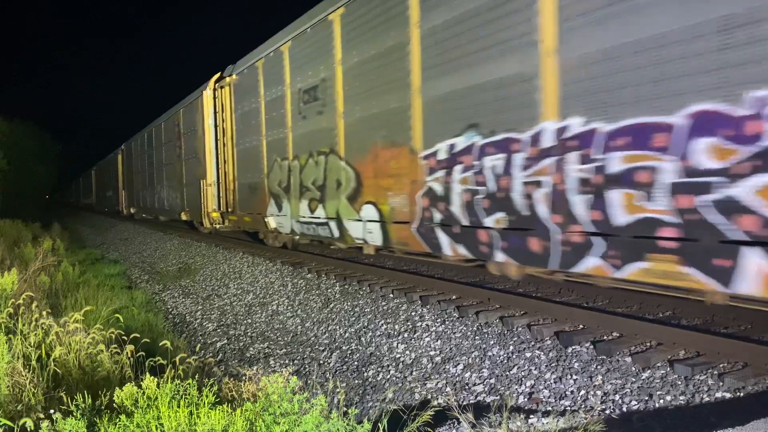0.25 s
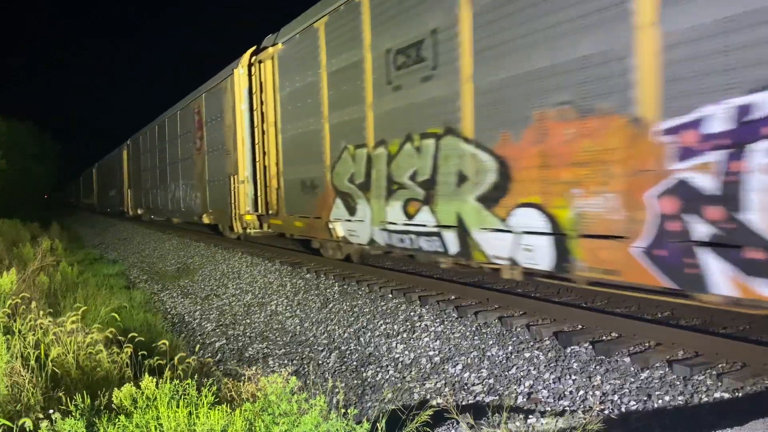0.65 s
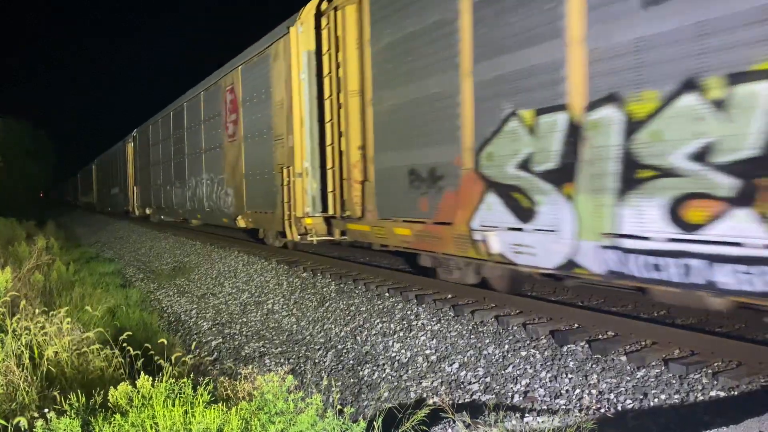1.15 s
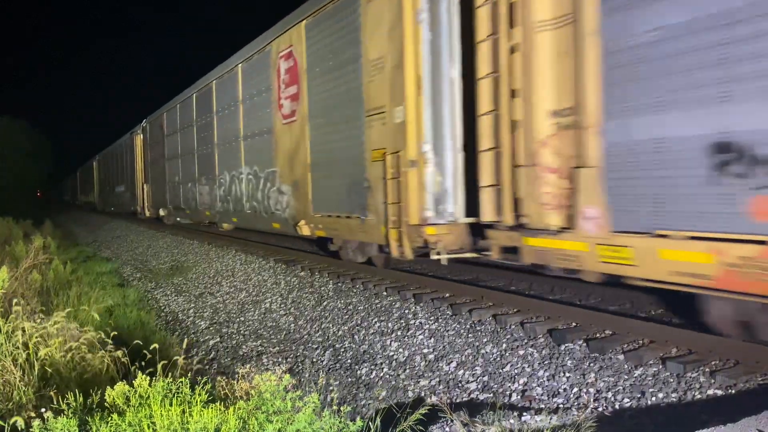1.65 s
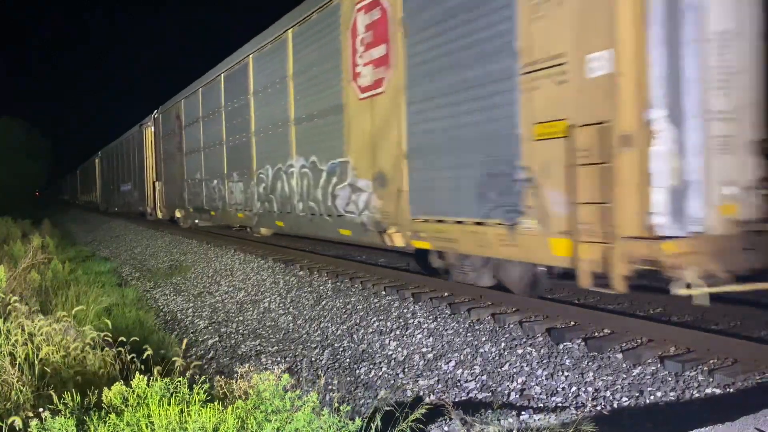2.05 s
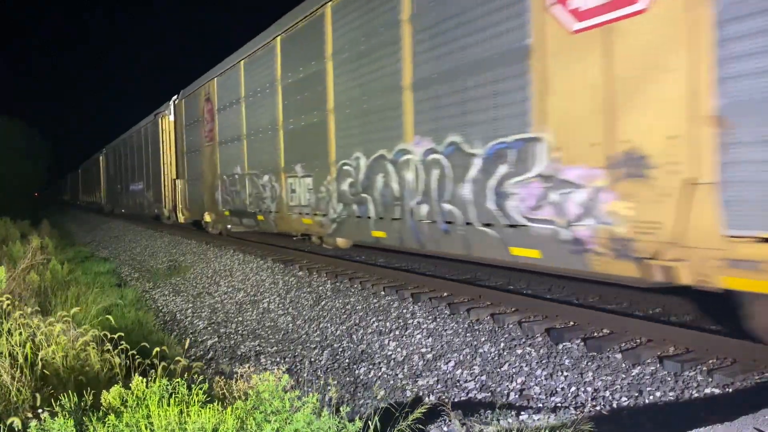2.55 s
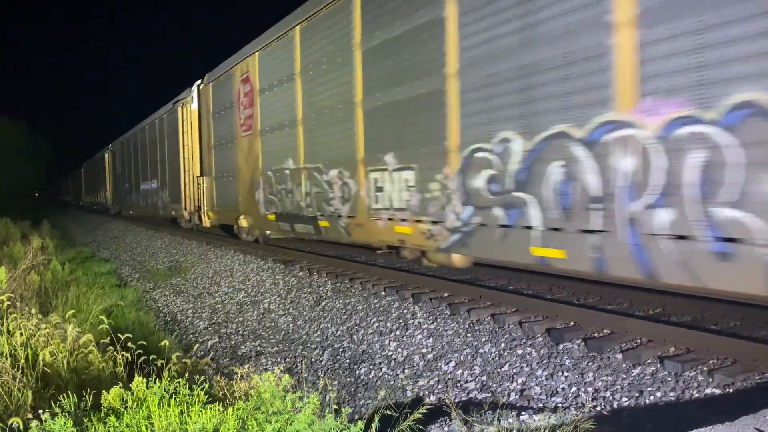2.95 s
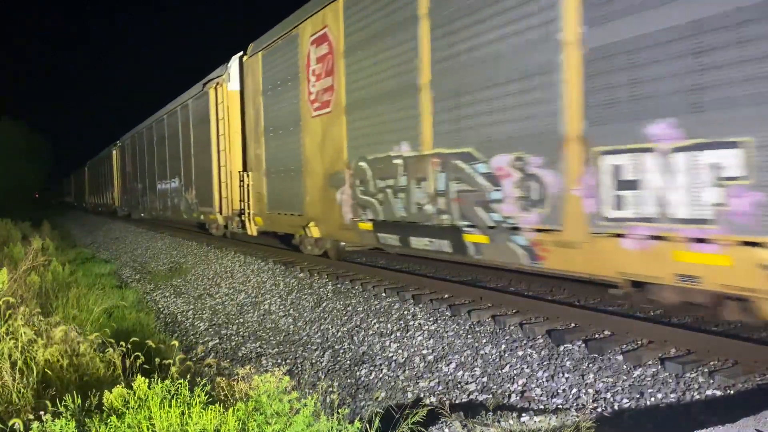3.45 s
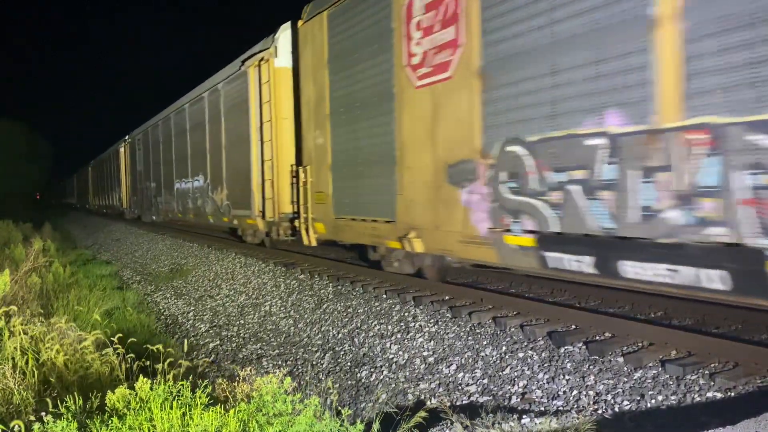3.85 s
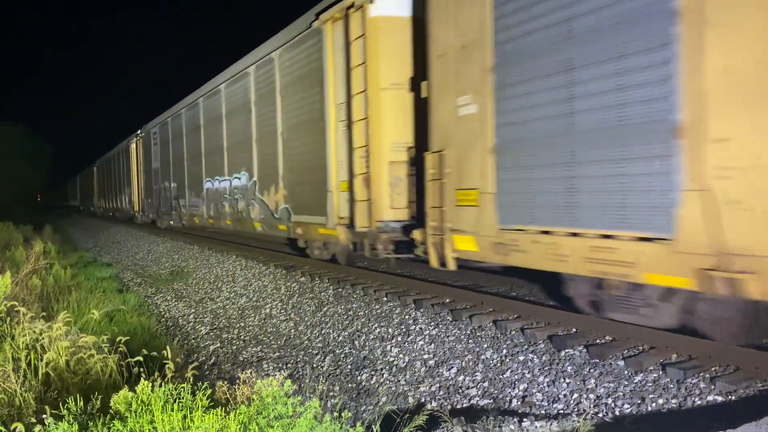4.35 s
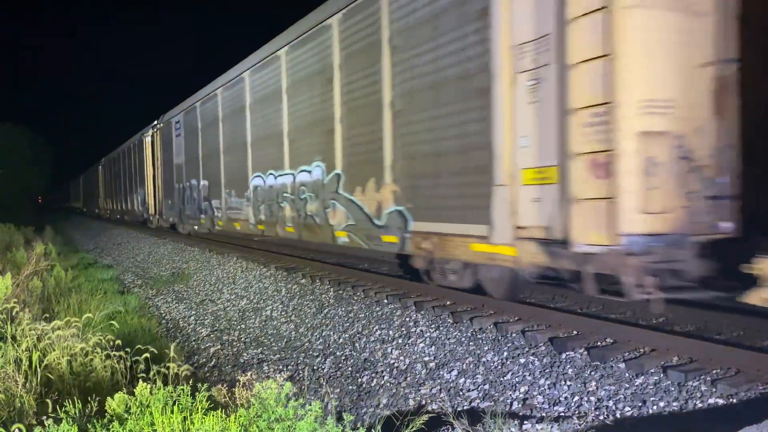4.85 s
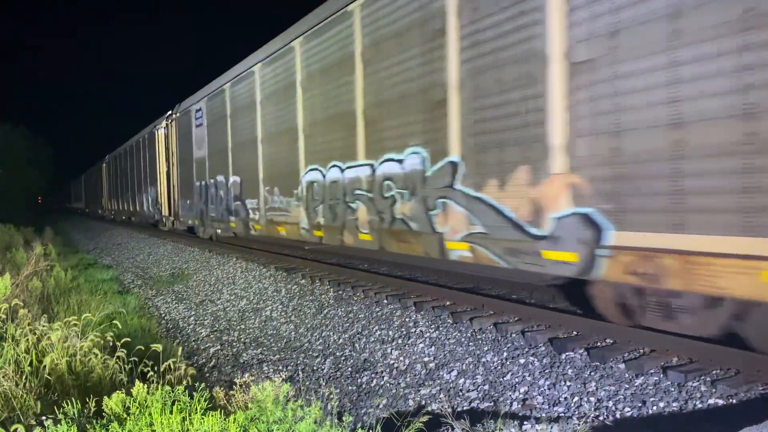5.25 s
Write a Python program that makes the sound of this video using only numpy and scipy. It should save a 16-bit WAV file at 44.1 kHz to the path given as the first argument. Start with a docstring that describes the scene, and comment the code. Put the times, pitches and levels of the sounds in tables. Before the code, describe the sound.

Close beside the track outdoors, a long freight train rolls by without a break. Hollow car bodies rumble low and their panels drum, while wheels roar and hiss on steel. Uneven deep thumps come several times a second. Brief faint squeaks appear early; from the middle on, gritty wheel scrapes pulse about five times a second, swelling to a loud clattering rush near the end. Stereo, bass-heavy handheld pickup.

```python
"""Deep rumble, wheel roar and quick heavy thumps: a freight train of tall car carriers rolls past close by.
The car bodies are evened-out low noise; their panels drum harder at each thump and bang, and some hum a note.
The wheels are steel-coloured noise, part spread along the train, part sliding from the middle to the right.
Out-of-round wheels thump as sagging deep tones, about once a turn each, stronger later on.
Brief squeaks are ragged narrow tones; scrapes are swells of growl, grinding, hiss and ringing clatter."""
import sys
import numpy as np
from scipy import signal
from scipy.fft import rfft, irfft
from scipy.io import wavfile
from scipy.ndimage import uniform_filter1d, map_coordinates

SR = 44100
rng = np.random.default_rng(int(sys.argv[2]) if len(sys.argv) > 2 else 0)


def master_out(mix):
    """Clip the mix to full scale and print it as 16-bit PCM to the path in sys.argv[1]."""
    frames = np.transpose(np.atleast_2d(mix))
    ceiling = np.clip(frames, -1, 1)
    pcm = np.round(ceiling * 32767).astype(np.int16)
    wavfile.write(sys.argv[1], SR, pcm)


N = 242991
TIME = np.arange(N) / SR
FREQS = np.maximum(np.fft.rfftfreq(N, 1 / SR), 1)

# heaves of the cars over out-of-round wheels:
# (time [s], half length [s], boom pitch [Hz], level [dB])
HEAVES = [(0.06, 0.061, 74.3, -24), (0.153, 0.033, 68, -19), (0.405, 0.024, 71, -21),
          (0.605, 0.028, 80, -16), (0.797, 0.013, 85, -12.5), (0.935, 0.047, 78.4, -21.5),
          (1.106, 0.013, 84, -14.5), (1.456, 0.061, 72.2, -17.5), (1.685, 0.03, 68.7, -12),
          (1.899, 0.058, 80, -14), (2.103, .026, 70, -15.5), (2.361, 0.037, 67.5, -15),
          (2.535, 0.042, 75, -12.5), (2.795, .022, 68, -11.5), (2.951, 0.02, 68, -10),
          (3.172, 0.023, 81.5, -12.5), (3.298, 0.023, 78, -15.5), (3.455, 0.028, 83, -11.5),
          (3.632, 0.06, 74.6, -13), (3.88, 0.026, 67, -12), (4.039, 0.032, 76, -15.5),
          (4.221, 0.018, 71, -16), (4.403, 0.018, 62, -13), (4.487, 0.029, 77, -12),
          (4.552, 0.015, 66, -11.5), (4.697, 0.016, 63, -11), (4.761, 0.048, 59, -12.5),
          (4.923, 0.027, 67, -10.5), (4.99, 0.031, 57.7, -9), (5.147, 0.017, 68, -8.5),
          (5.213, 0.027, 59, -10), (5.379, 0.013, 67.4, -9), (5.452, 0.027, 52, -19)]


def from_db(db):
    """Decibels to gain."""
    return 10 ** (np.asarray(db) / 20)


def rms_one(x):
    """Scale to unit power."""
    return x / np.sqrt(np.mean(x ** 2) + 1e-20)


def over_hz(points):
    """Join (frequency [Hz], value) points on a log-frequency axis."""
    hz, value = np.transpose(points)
    return np.interp(np.log(FREQS), np.log(hz), value)


def in_time(rows):
    """Join the columns of a curve by straight lines in time."""
    times, *columns = np.transpose(rows)
    return [np.interp(TIME, times, column) for column in columns]


def white(count):
    """Spectra of unrelated white noises."""
    shape = (count, len(FREQS))
    return rng.standard_normal(shape) + 1j * rng.standard_normal(shape)


def drift(rate_hz):
    """Smooth random wandering of spread 1, with two random knots per cycle of the rate."""
    knots = rng.standard_normal(N // 20)
    coarse = TIME[::8]
    curve = map_coordinates(knots, [coarse * rate_hz * 2], order=2, mode="wrap")
    return rms_one(np.interp(TIME, coarse, curve))


def swell(at, half_length, time=TIME, tail=1.016, squareness=2):
    """A bell of height 1 that falls a little more slowly than it rises; squareness above 2 flattens its top."""
    width = half_length * np.where(time < at, 1 / tail, tail)
    distance = np.abs((time - at) / width)
    return np.exp(-0.5 * np.minimum(distance ** squareness, 60))


def swells(times, half_lengths, levels_db, squareness=2):
    """An envelope of swells; where they overlap they add in power."""
    coarse = TIME[::40]
    power = np.zeros(len(coarse))
    for at, half, db in np.broadcast(times, half_lengths, levels_db):
        power += (from_db(db) * swell(at, half, coarse, squareness=squareness)) ** 2
    return np.interp(TIME, coarse, np.sqrt(power))


def steel(colour):
    """Gain over frequency: a broad colour reshaped by the resonances of wheels and side panels."""
    # steel resonances: (pitch [Hz], width [Hz], lift [dB])
    resonances = [(275, 3.1, 2), (917, 33, -0.5), (1566, 56, 3), (1730, 43, 1.5), (2530, 91, 3),
                  (3010, 25, 3), (7230, 170, -1.5)]
    lift_db = sum(db / (1 + (2 * (FREQS - hz) / width) ** 2) for hz, width, db in resonances)
    return from_db(over_hz(colour) + lift_db)


def scattered(colour, treble_tie_hz=6500, treble_lag_ms=0.2734):
    """Stereo noise from the whole train; the treble is alike in both channels, the left a fixed moment late."""
    # left-right likeness, limited to 1 below: (frequency [Hz], likeness [ratio])
    likeness = [(90, 1.8), (290, 1.0), (420, 1.0), (560, 1.04), (720, 0.65), (900, 0.1), (1400, 0),
                (2200, -0.0179)]
    # lead of the left channel: (frequency [Hz], phase [rad])
    left_lead = [(35, 0.5), (90, -1), (130, 1.47), (290, -1.47), (420, -1.01), (560, -2.5), (720, -1.5),
                 (1400, -10)]
    treble_share = 1 / (1 + (treble_tie_hz / FREQS) ** 3)
    treble_tie = treble_share * np.exp(-2j * np.pi * FREQS * treble_lag_ms / 1000)
    shared = over_hz(likeness) * np.exp(1j * over_hz(left_lead)) + treble_tie
    shared = shared / np.maximum(np.abs(shared), 1)
    right, own = white(2) * steel(colour)
    left = shared * right + np.sqrt(np.maximum(1 - np.abs(shared) ** 2, 0)) * own
    return rms_one(irfft(np.array([left, right]), N))


def passing(colour, ahead_ms=-0.0085, sweep_ms=0.444, crossing_s=0.55):
    """Noise straight from the nearest truck: the left channel lags more and more as it goes by."""
    car_pass_s, car_period_s = 4.55, 2.62  # a car end draws level; time from one to the next
    approach_s = 1.2  # a truck becomes the nearest this long before it draws level
    since = (TIME - car_pass_s + approach_s) % car_period_s - approach_s
    lag_ms = ahead_ms + sweep_ms * (1 + np.tanh(since / crossing_s)) / 2
    right = rms_one(irfft(white(1)[0] * steel(colour), N))
    left = map_coordinates(right, [np.arange(N) - lag_ms * SR / 1000], order=3, mode="wrap")
    return np.array([left, right])


def contact(colour, direct_share):
    """Wheel-on-rail noise, part direct and part scattered; the shares are of power."""
    return np.sqrt(direct_share) * passing(colour) + np.sqrt(1 - direct_share) * scattered(colour)


def evened(x, window_s):
    """A heavy body swings at a steady height: random in phase, fairly even in strength."""
    size = max(int(window_s * SR), 8)
    power = np.mean(x ** 2, axis=0)
    power = uniform_filter1d(uniform_filter1d(power, size), size)
    return rms_one(x / np.sqrt(power + 0.05))


def stick_slip(hz, width_hz, glide_hz=0, left_lag_rad=0.81):
    """Ragged stick and slip feeds one resonance at a fairly even strength; the left channel lags in phase."""
    feed = drift(width_hz / 2) + 1j * drift(width_hz / 2)
    even_feed = feed / np.sqrt(1 + np.abs(feed) ** 2)
    phase = 2 * np.pi * np.cumsum(hz + glide_hz + np.zeros(N)) / SR
    phase = phase - left_lag_rad * np.array([[1], [0]])
    return rms_one(np.real(even_feed * np.exp(1j * phase)))


def car_bodies(drum_gain_db=2.5, heave_db=-11, drum_half_s=0.035):
    """The bodies rumble all the time and their side panels drum, harder at every heave or bang."""
    # body levels, the drumming before its gain: (time [s], rumble [dB], panel drumming [dB])
    body_levels = [(0.0, -19.5, -26), (0.32, -22.5, -24.5), (0.7, -23.5, -27.5), (0.98, -25, -22.5),
                   (1.3, -22.5, -25.5), (1.78, -19.5, -23), (3.2, -19, -20), (4.25, -16.5, -18.5),
                   (4.63, -27, -18.5), (4.85, -17, -20.5), (5.32, -23.5, -21), (5.51, -16, -19.5)]
    # loose side panels bang: (time [s], level [dB])
    bangs = [(1.225, -20), (1.44, -21.5), (2.125, -20), (2.318, -19.5), (2.53, -20), (4.345, -16),
             (4.517, -16), (4.691, -17), (4.76, -18), (4.95, -15)]
    # colours of the hollow bodies and their panels: (frequency [Hz], level [dB])
    body_colour, panel_colour = [(20, -42), (32, -29), (42, -15), (52, 2.5), (62, 1), (85, -6), (105, -5.5),
                                 (140, -32), (300, -107)], [(60, -6.5), (110, 1.5), (150, 1.5), (175, -1.5), (215, -1.5),
                                               (260, -1), (320, -6), (420, -13), (600, -14), (1000, -64)]
    rumble_db, drum_db = in_time(body_levels)
    shaken = [(at, db + heave_db) for at, _, _, db in HEAVES]
    times, hit_db = np.transpose(shaken + list(bangs))
    rumble = from_db(rumble_db) * evened(scattered(body_colour), window_s=0.062)
    drum_level = np.hypot(from_db(drum_db + drum_gain_db), swells(times, drum_half_s, hit_db))
    return rumble + drum_level * evened(scattered(panel_colour), window_s=0.25)


def wheels(roar_gain_db=3, truck_gain_db=3, hiss_gain_db=2.0, hiss_directness=0.54):
    """Rough treads roll on the rail, roaring and hissing; the nearest truck stands out as it goes by."""
    # wheels rolling nearer and farther, levels before the gains:
    # (time [s], rail roar [dB], contact hiss [dB], power share straight from the nearest truck [0-1])
    rolling = [(0.0, -37.5, -42, 0.4), (0.6, -37.5, -42, 0.03), (1.2, -36.5, -42, 0.05),
               (2.16, -31.5, -36, 0.12), (2.62, -32, -34.5, 0.1), (3.11, -30, -36, 0),
               (4.22, -29, -34, 0.16), (4.7, -29.5, -28, 0.45), (5.03, -30.5, -27.5, 0.88),
               (5.33, -33, -37, 0.63), (5.51, -33, -36.5, 0.97)]
    # colours of the whole train, the nearest truck and the hiss: (frequency [Hz], level [dB])
    train_colour, truck_colour, hiss_colour = [(250, -38), (480, 2), (740, 3.5), (950, 1.5), (1250, -2.5),
                                               (1600, -3), (2400, -5), (3200, -19), (6000, -43)], [(250, -10), (430, -0.5), (700, -7), (950, 3),
                                                             (1250, 0.5), (1600, -7.5), (2400, -10),
                                                             (3200, -19), (6000, -45)], [(1500, -4), (2400, -3),
                                                                                 (3000, 1.5), (4000, -2),
                                                                                 (5500, -3.5), (7000, -7),
                                                                                 (8500, -14.5),
                                                                                 (11000, -12), (13000, -17),
                                                                                 (16000, -28)]
    roar_db, hiss_db, share = in_time(rolling)
    train = np.sqrt(1 - share) * from_db(roar_db + roar_gain_db) * scattered(train_colour)
    truck = np.sqrt(share) * from_db(roar_db + truck_gain_db) * passing(truck_colour)
    hiss = from_db(hiss_db + hiss_gain_db) * contact(hiss_colour, hiss_directness * share)
    return train + truck + hiss


def wandering_modes(x, depth_db, mode_hz=55, hold_s=0.07, size=1024):
    """As the contact patch wanders over the tread, narrow bands of the sound flare up and die away."""
    hz, times, frames = signal.stft(x, SR, nperseg=size)
    grid = np.meshgrid(hz / mode_hz, times / hold_s, indexing="ij")
    chance = rng.standard_normal((size, size // 4))
    flare = rms_one(map_coordinates(chance, grid, order=2, mode="wrap"))
    gain = rms_one(from_db(depth_db * flare))
    return signal.istft(frames * gain, SR, nperseg=size)[1][:, :N]


def rattle(per_s=70, decay_s=0.012, strength=0.28):
    """Grit and rough spots jolt the running gear: a gain that jumps at each jolt and dies away."""
    jolts = (rng.random(N) < per_s / SR) * np.minimum(rng.exponential(1, N), 3)
    decay = np.exp(-1 / (decay_s * SR))
    shaking = signal.lfilter([1], [1, -decay], jolts + 1e-18)
    return rms_one(np.sqrt(1 + strength * shaking))


def booms(left_lag_ms=0.92, sag_octaves=0.21):
    """Each heave swings a hollow car body through a few deep cycles that sag in pitch as the load eases."""
    out = np.zeros((2, N))
    heard = TIME - np.array([[left_lag_ms / 1000], [0]])
    for at, half, hz, db in HEAVES:
        live = slice(*np.searchsorted(TIME, [at - 5 * half, at + 5 * half]))
        since = heard[:, live] - at
        # the pitch sags by about sag_octaves in each half length
        cycles = hz * since * 2 ** (-sag_octaves * since / half / 2)
        wave = np.sin(2 * np.pi * (cycles + rng.random()))
        out[:, live] += np.sqrt(2) * from_db(db) * np.exp(-0.5 * (since / half) ** 2) * wave
    return out


def clatter(per_s=110, t60_s=0.056, uneven_db=5, left_lag_ms=0.14):
    """A scraping wheel catches again and again; each jolt rings the steel modes with strengths of its own."""
    # rings of a jolted wheel and its truck: (pitch [Hz], level [dB])
    rings = [(735, -9.5), (840, 1), (935, -2), (1110, -10), (1410, -3), (1640, 0), (1830, 0.5), (2080, 1),
             (2290, 5), (2460, -1), (2880, 4), (4680, 3)]
    at = np.flatnonzero(rng.random(N) < per_s / SR)
    sizes = rng.uniform(0.4, 1, len(at))
    decay = from_db(-60 / (t60_s * SR))
    right = np.zeros(N)
    for hz, db in rings:
        step = 2 * np.pi * hz / SR
        strengths = from_db(db + uneven_db * rng.uniform(-0.88, 1, len(at)))
        jolts = np.zeros(N)
        jolts[at] = sizes * strengths * rng.choice([-1, 1], len(at))
        resonator = [1, -2 * decay * np.cos(step), decay ** 2]
        right += signal.lfilter([0, np.sin(step)], resonator, jolts + 1e-18)
    left = np.interp(TIME - left_lag_ms / 1000, TIME, right)
    return rms_one(np.array([left, right]))


def rubbing(growl_gain_db=-2.2, grind_gain_db=-2, clatter_db=-5.5, hiss_gain_db=-0.4,
            snatch_db=1.5, catch_db=0.8, squareness=2.33):
    """Wheels scrape the rail head, catching and slipping in a gritty, clattering rush that holds for a moment."""
    # scrapes, the nearest wheel about once a turn, levels before the gains:
    # (time [s], half length [s], growl [dB], grinding [dB], hiss [dB])
    scrapes = [(1.059, 0.054, -39, -35, -37), (1.222, 0.044, -35, -38, -42), (1.47, 0.032, -42, -39, -38),
               (1.72, .035, -44, -44, -38), (2.25, 0.037, -48, -49, -37), (2.59, 0.043, -47, -35, -45),
               (2.84, 0.033, -26, -35, -42), (3.035, 0.033, -22, -37, -34), (3.262, 0.042, -30, -32, -34.5),
               (3.461, 0.054, -27, -29.5, -31.5), (3.68, 0.052, -29.5, -27, -30),
               (3.887, 0.06, -30, -26, -28), (4.101, 0.063, -26, -23.5, -28),
               (4.322, 0.049, -20, -22, -23.5), (4.522, 0.043, -25, -22, -24.5),
               (4.76, 0.054, -22, -25, -24.5), (4.982, 0.053, -25, -27, -27), (5.2, 0.052, -38, -28, -27.5),
               (5.426, 0.052, -44, -32.5, -35.5)]
    # colours of the three parts: (frequency [Hz], level [dB])
    growl_colour, grind_colour, hiss_colour = [(250, -22), (480, -2), (600, -1.5), (740, 1), (950, 4),
                                               (1120, -4), (1400, -5), (3000, -37)], [(700, -25), (1150, -4), (1400, -9.5),
                                                              (1700, 0), (2400, -2.5), (3200, -11),
                                                              (6000, -50)], [(1500, -6), (2400, -7),
                                                                             (3000, 2), (4000, 1),
                                                                             (5500, -0.5), (7000, -3.5),
                                                                             (8500, -11.5), (11000, -7.5),
                                                                             (14000, -15.5), (16000, -15)]
    times, halves, *levels_db = np.transpose(scrapes)
    growl_level, grind_level, hiss_level = (swells(times, halves, db, squareness) for db in levels_db)
    growl = growl_level * from_db(growl_gain_db) * contact(growl_colour, direct_share=0.28)
    grit = from_db(grind_gain_db) * contact(grind_colour, direct_share=0.46)
    grind = grind_level * (grit + from_db(clatter_db) * clatter())
    snatching = from_db(hiss_gain_db + snatch_db * drift(14))
    hiss = hiss_level * snatching * contact(hiss_colour, direct_share=0.11)
    return (growl + grind) * from_db(catch_db * drift(45)) + hiss


def squeaks():
    """Steel sings, squeaks or rasps on steel for a moment, sometimes sliding in pitch."""
    # squeaks, the pitch as it stands at the peak:
    # (time [s], half length [s], pitch [Hz], rough width [Hz], level [dB], glide [Hz/s])
    squeals = [(1.053, 0.033, 2250, 70, -39.5, 1), (1.056, 0.032, 4030, 1050, -37.5, 1),
               (1.05, 0.03, 6500, 700, -43, 1), (1.227, 0.016, 2970, 63, -38.5, 0),
               (1.261, 0.047, 1490, 34, -43, -80), (1.26, 0.038, 3500, 18, -42.5, -1),
               (1.455, 0.025, 7000, 1000, -43.5, -6000), (1.522, 0.051, 1524, 36, -40.5, 199.5),
               (1.714, 0.063, 1490, 10, -38, -170), (1.909, 0.15, 3300, 530, -39.5, -900),
               (2.117, 0.012, 4900, 520, -38, -2), (2.223, 0.022, 3270, 98, -39, 4999.5),
               (2.238, .028, 5200, 400, -50, 9000), (2.274, 0.17, 1520, 30, -43, -170),
               (2.547, 0.015, 1705, 23, -34, 1), (3.87, 0.03, 7080, 260, -37, 2.5),
               (4.2, 0.049, 1530, 14, -35, -200), (4.333, 0.038, 1860, 30, -29, -2),
               (4.363, 0.031, 1580, 18, -27.5, 400.5), (4.348, 0.032, 7050, 170, -38, -1),
               (4.64, 0.028, 4700, 130, -36, -5), (4.752, 0.049, 3660, 700, -32, -3000),
               (4.76, 0.017, 1095, 28, -31, 0), (4.97, 0.033, 2920, 910, -34, -0.5),
               (5.175, 0.048, 3100, 920, -34.5, -0.5)]
    out = np.zeros((2, N))
    for at, half, hz, width, db, glide in squeals:
        out += from_db(db) * swell(at, half) * stick_slip(hz, width, glide * (TIME - at))
    return out


def ringing_panels():
    """A shaken side panel hums briefly on its own note."""
    # humming panels: (time [s], half length [s], pitch [Hz], rough width [Hz], level [dB])
    hums = [(1.22, 0.014, 245, 30, -17.5), (1.355, 0.069, 259, 10, -26.5), (1.845, 0.052, 260.3, 15, -20),
            (2.267, 0.059, 256.8, 13.2, -30), (4.11, 0.023, 375, 40, -28), (4.684, 0.013, 289.4, 25, -16.5),
            (4.727, 0.025, 367.6, 48, -19.5), (5, 0.044, 335, 50, -23.5)]
    out = np.zeros((2, N))
    for at, half, hz, width, db in hums:
        out += from_db(db) * swell(at, half) * stick_slip(hz, width, left_lag_rad=1.02)
    return out


def scene():
    """Bodies, wheels, thumps, scrapes, squeaks and panels together."""
    running_gear = wandering_modes(wheels() + rubbing(), depth_db=2.5) * rattle()
    return car_bodies() + running_gear + booms() + squeaks() + ringing_panels()


def record(dry, low_cut_hz=29, ceiling=0.95, top_cut_hz=15800):
    """The right channel gets more midrange; the deepest bass rolls off, peaks are rounded and the top is cut."""
    # left minus right: (frequency [Hz], difference [dB])
    balance = [(60, 0.5), (160, -2), (450, 0.5), (720, -5.5), (1000, -3.5), (1500, -1.5), (2400, -2),
               (3300, 1), (6000, -0.5)]
    roll_off = 1 / np.hypot(1, (low_cut_hz / FREQS) ** 5)
    tilt = from_db(over_hz(balance) * [[0.5], [-0.5]])
    channels = irfft(rfft(dry) * roll_off * tilt, N)
    rounded = channels / (1 + (channels / ceiling) ** 6) ** (1 / 6)
    top_cut = signal.ellip(10, 0.1, 90, top_cut_hz, fs=SR, output="sos")
    return signal.sosfilt(top_cut, rounded)


dry = scene()
out = record(dry)
master_out(out)
```